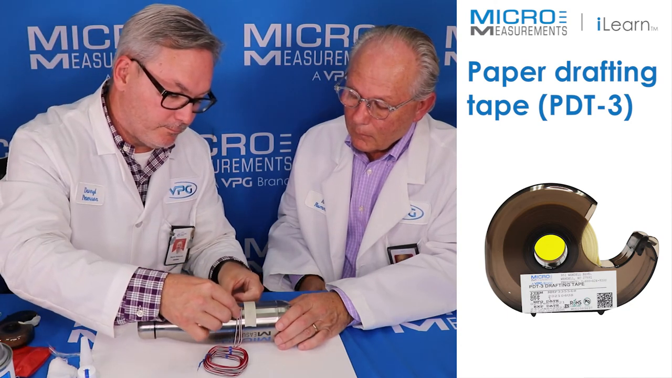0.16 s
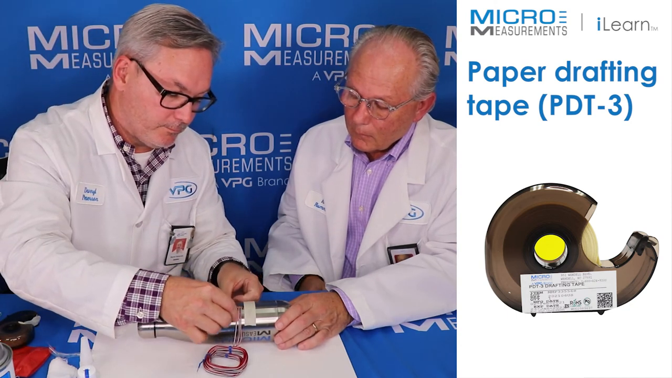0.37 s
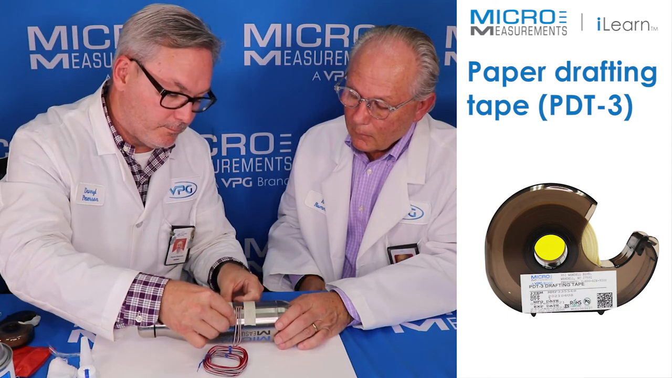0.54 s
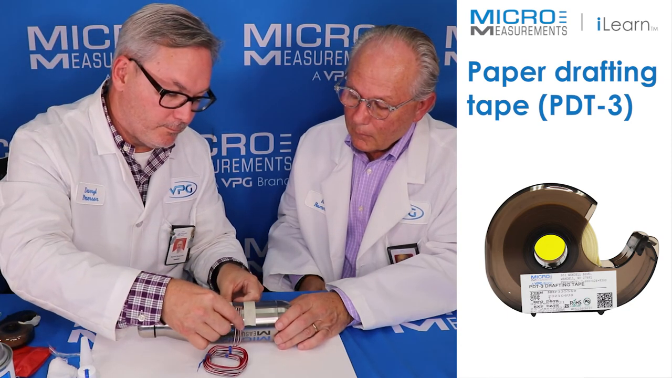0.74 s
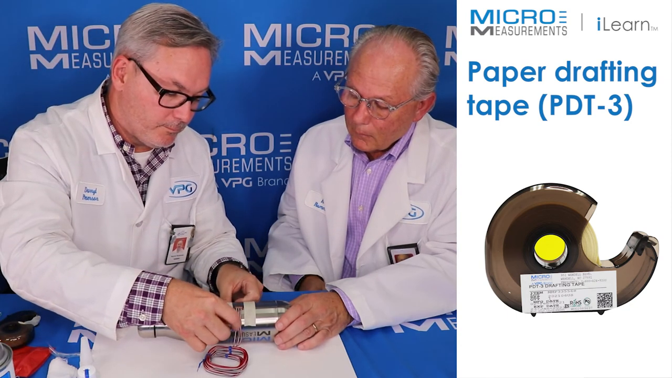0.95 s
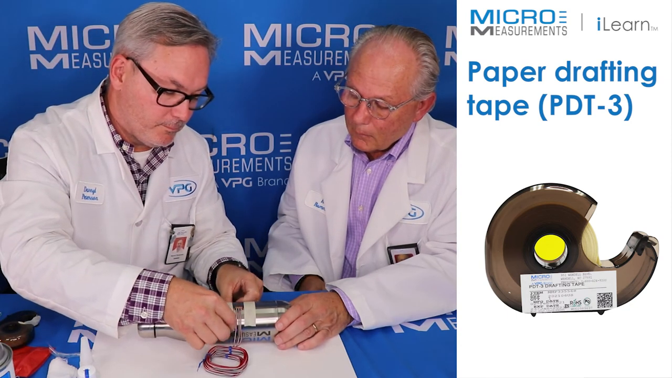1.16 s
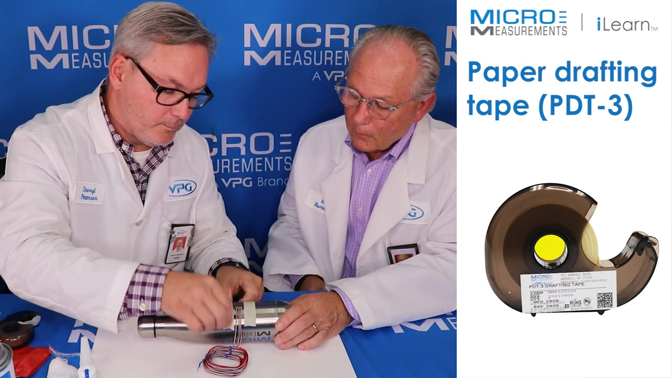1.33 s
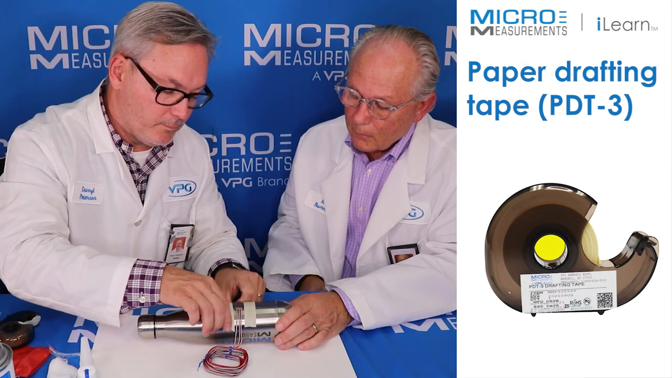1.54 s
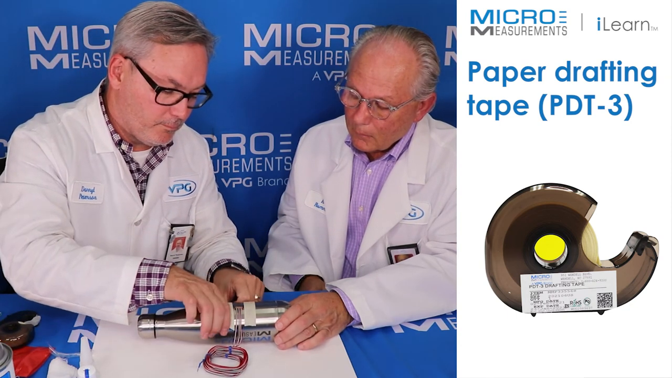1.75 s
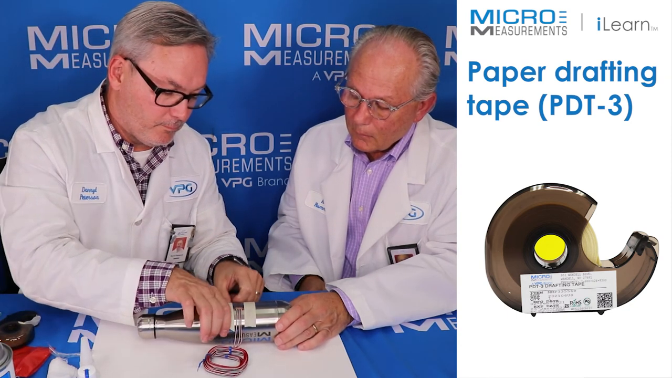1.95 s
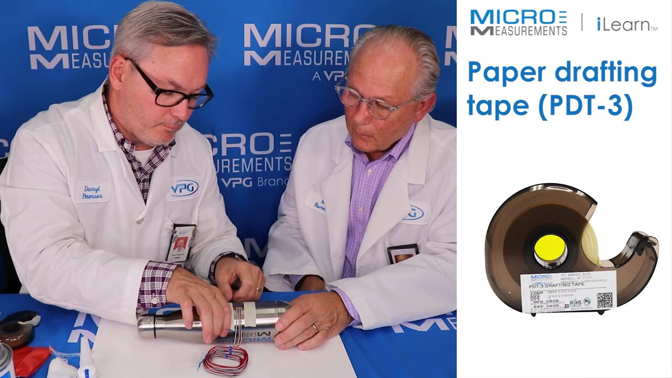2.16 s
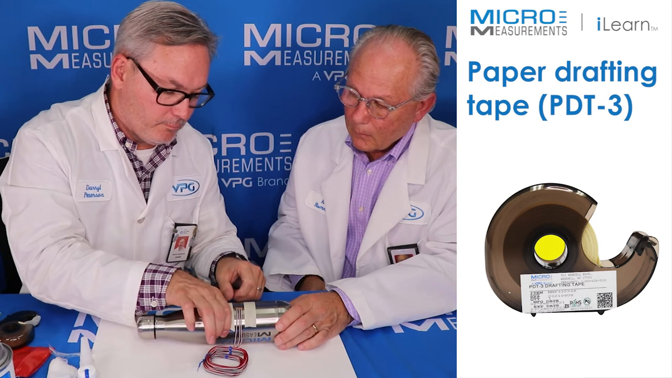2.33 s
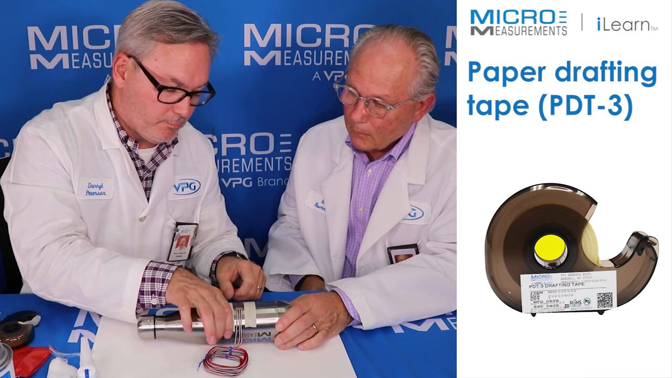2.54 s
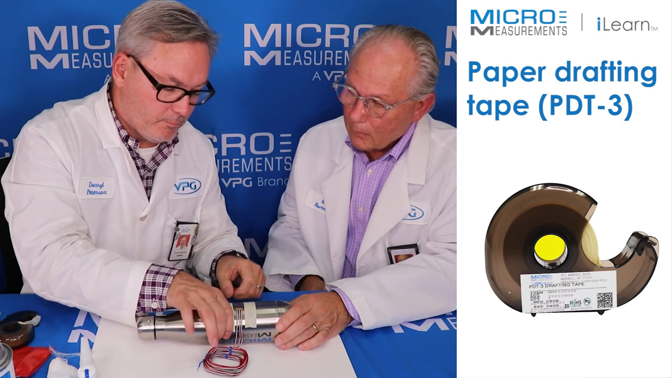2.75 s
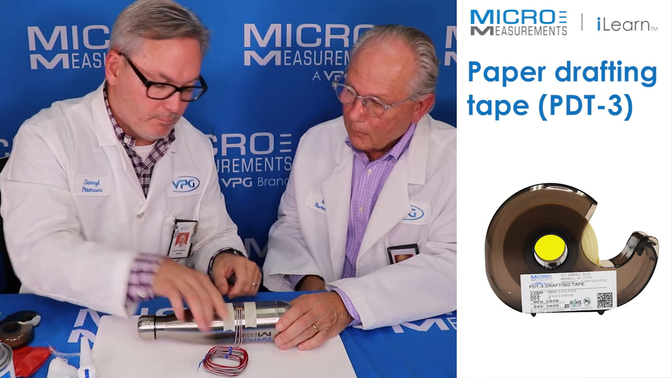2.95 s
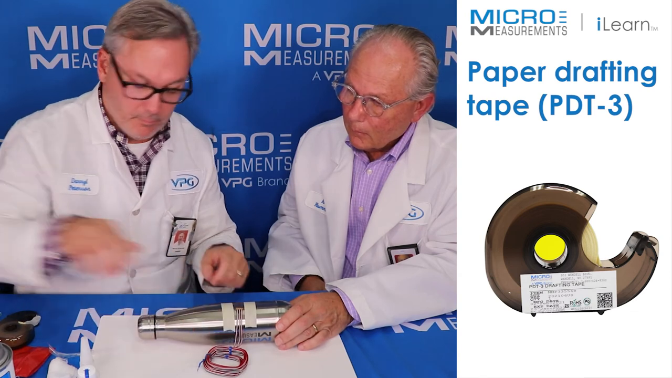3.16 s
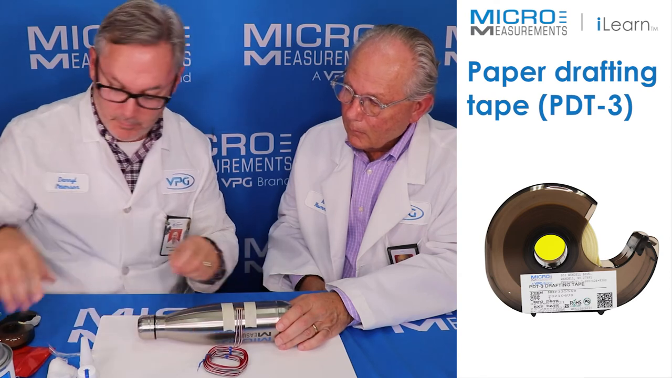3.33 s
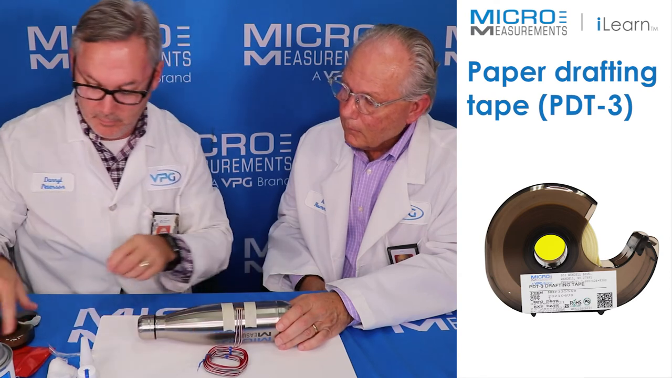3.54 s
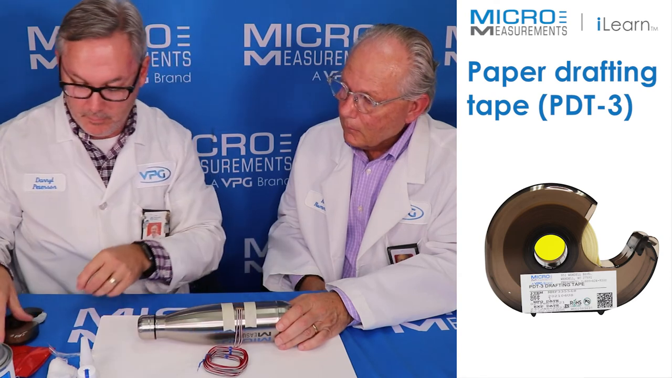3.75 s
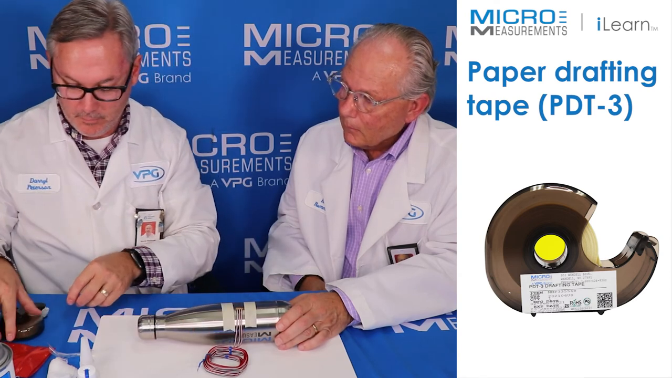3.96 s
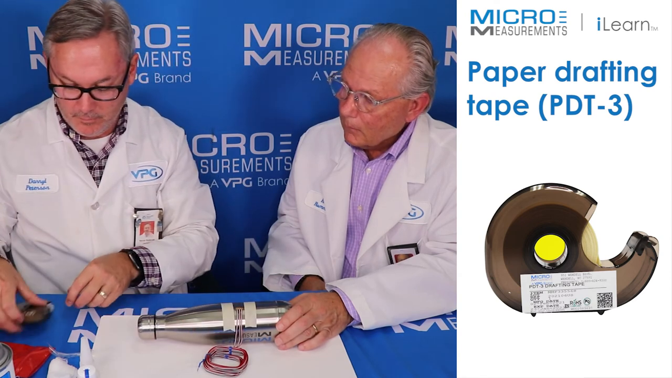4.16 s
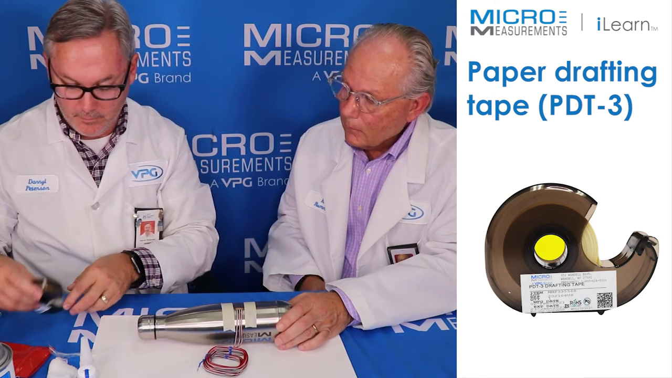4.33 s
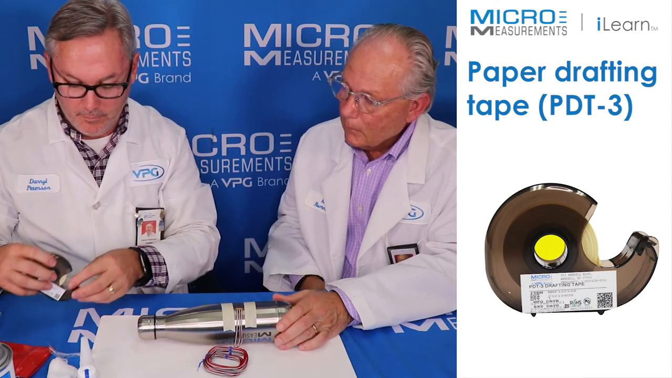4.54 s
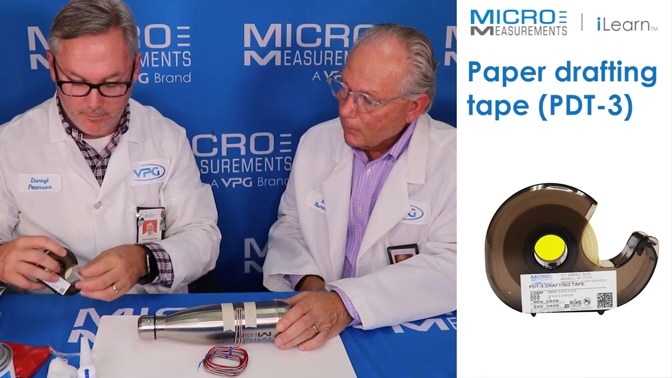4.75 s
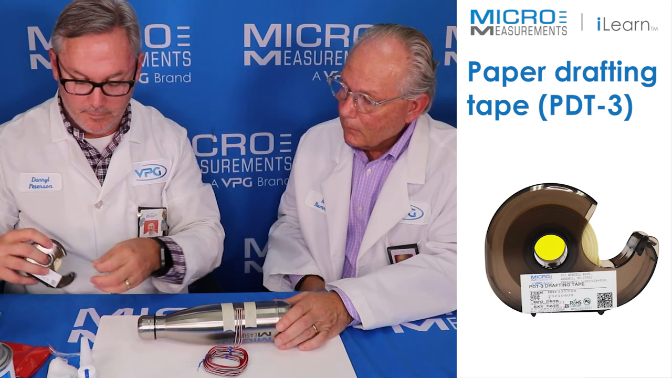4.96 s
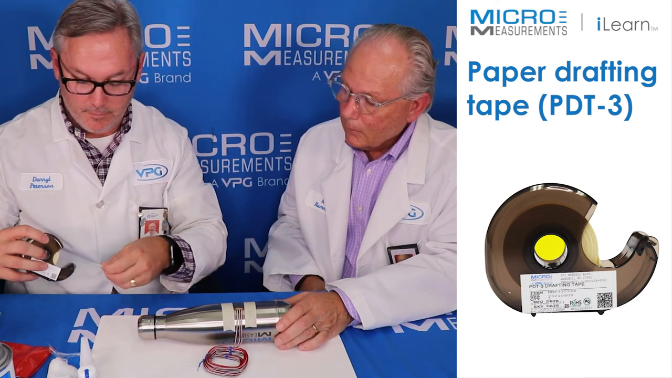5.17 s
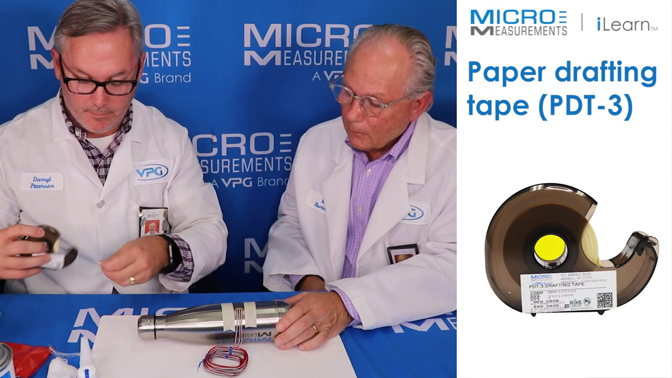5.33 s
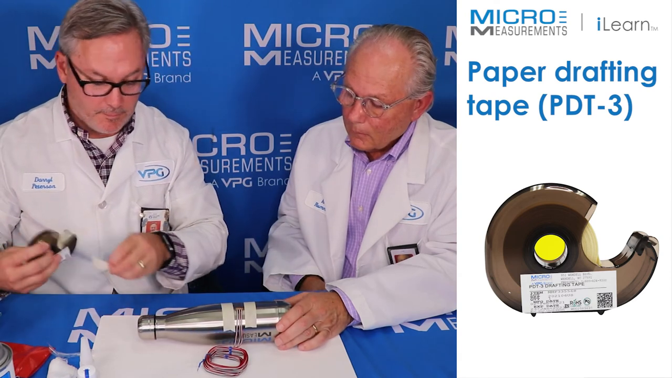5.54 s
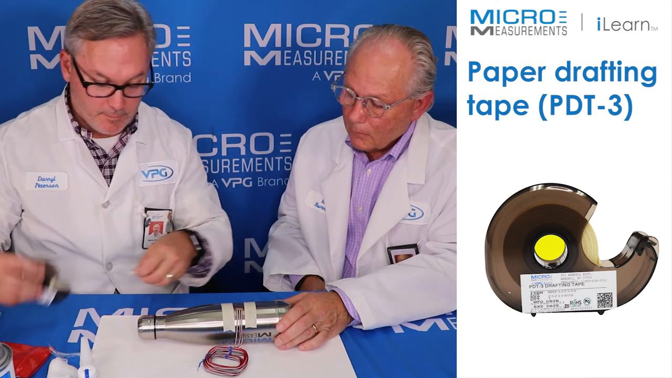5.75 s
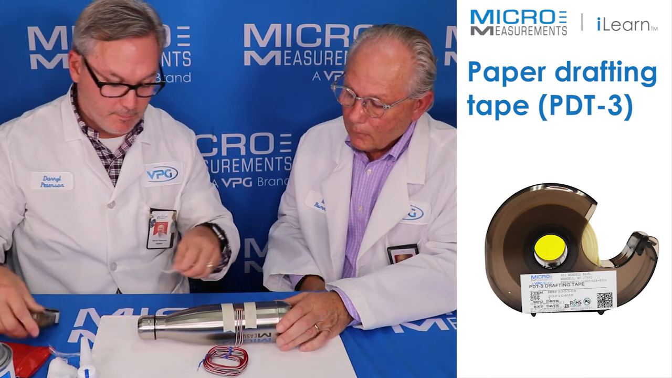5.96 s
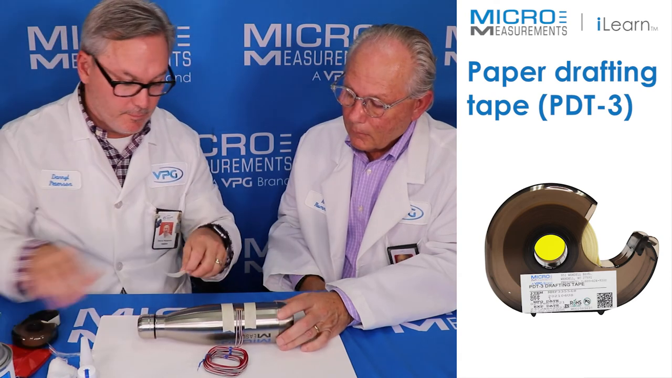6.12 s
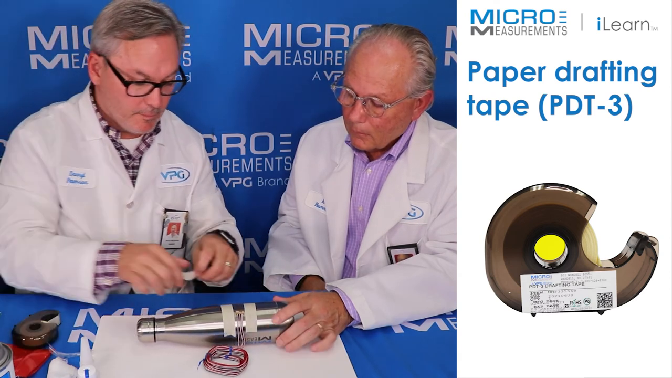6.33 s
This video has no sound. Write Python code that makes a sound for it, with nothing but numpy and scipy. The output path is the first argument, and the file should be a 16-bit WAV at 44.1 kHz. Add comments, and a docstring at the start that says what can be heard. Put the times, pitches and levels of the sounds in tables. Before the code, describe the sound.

Mostly near silence over soft air rumble and fan hum, with faint dry rubs on tape stuck to a metal tube. A plastic tape dispenser is handled with dull little ticks. Sticky crackles and a short papery pull lead to a very fast tear and one loud, dry snap with tiny flicks after it. The dispenser is set down in a rocking clatter, closely miked in a small room with a short tail.

```python
"""In a small, quiet room with a cloth-covered table, paper tape is rubbed down on a metal tube.
A plastic dispenser is picked up; a strip is unstuck, peeled off the roll and torn until it snaps free.
The dispenser is then put back on the table with a clatter. Ventilation rumbles and hums throughout.
Glue, paper and skin are streams of tiny random clicks sent through resonances; knocks are single clicks
with a short chatter. The squeaks and the hum are sine tones, and the rumble is coloured noise."""
import sys
import numpy as np
from scipy import signal
from scipy.fft import rfft, irfft
from scipy.io import wavfile

SR = 44100
rng = np.random.default_rng(int(sys.argv[2]) if len(sys.argv) > 2 else 0)


def transcribe(u):
    """Save the signal u as a 16-bit wav file named by the first command-line argument.

    u: samples, shape (n,) or (channels, n), limited to [-1, 1]; the rate is SR.
    q: integer samples, one column per channel.
    """
    v = np.clip(np.atleast_2d(u).T, -1, 1)
    q = np.round(v * 32767).astype(np.int16)
    wavfile.write(sys.argv[1], SR, q)


N = 286429
TIME = np.arange(N) / SR  # seconds

# pulls on the strip, first to unstick it, then to draw it out: fastest_s, length_s, level_db
PULLS = [(4.749, 0.13, -41), (4.958, 0.31, -33.5)]
PULL_EASE_DB = 22  # a pull starts and ends this far under its peak

# runs of paper fibres giving way on the teeth: start_s, length_s, level_db, swell_db, dull_above_hz
TEARS = [(5.388, 0.059, -42.5, 31.5, 14000), (5.433, 0.0071, -33.5, 2, 5000),
         (5.4503, 0.0029, -30.5, 1.5, 14000), (5.4545, 0.019, -19.5, 5.5, 11900),
         (5.515, 0.0099, -42, 0, 11000), (5.54, 0.052, -41.5, 5, 8040), (5.592, .007, -35.5, 8.5, 10000),
         (5.604, 0.024, -40.5, -12, 4200)]
TEAR_ATTACK_S, TEAR_RELEASE_S, TEAR_THIN_HZ = 0.00092, 0.0022, 650
FLAP_FREE_S = 5.5  # the tear has run far enough to loosen the strip

# the strip snaps free and its ends flick:
# start_s, level_db, thin_below_hz, dull_above_hz, chatter_share (0 to 1), favoured_pitch_hz
SNAPS = [(5.5996, -10.5, 1100, 12900, 0.22, 2570), (5.621, -35.5, 600, 2980, .5, 1925),
         (5.6488, -33, 604, 3470, 0.23, 1840), (5.6638, -36.5, 2000, 5000, 0.17, 4450)]

# glue lets go and the strip crackles: start_s, level_db, thin_below_hz, favoured_pitch_hz
CRACKLES = [(0.721, -64, 6000, 6900), (0.933, -65, 11000, 11000), (0.971, -50, 12150, 12500),
            (0.992, -59, 11000, 11000), (1.001, -60, 10110, 9500), (3.700, -47.5, 3150, 4400),
            (4.324, -52, 11500, 12040), (4.693, -53, 6000, 7000), (4.7061, -23.5, 1810, 4100),
            (4.7205, -40, 2500, 4200), (4.7335, -47, 2000, 3500), (4.744, -28.5, 298, 3100),
            (4.7515, -30.5, 300, 3240), (4.868, -35.5, 1200, 7000), (5.151, -41, 4060, 6000),
            (5.7485, -54.5, 1007, 4460)]
CRACKLE_REACH, CRACKLE_CHATTER = 3.8, 0.72  # high edge as a factor on the pitch; chatter share

# fingers and sleeve sliding over tape and plastic: start_s, length_s, level_db, centre_hz
RUBS = [(0.42, 0.082, -46.5, 5200), (0.88, 0.18, -72, 10900), (1.17, 0.088, -64.5, 1400),
        (1.45, 0.099, -55.5, 2800), (1.53, .17, -60, 2800), (1.71, 0.1, -68.5, 2650),
        (3.05, 0.37, -70, 3900), (3.69, 0.082, -56.5, 3500), (3.80, 0.074, -57.5, 5200),
        (3.925, 0.096, -54, 3050), (4.06, 0.12, -66, 3080), (4.32, 0.044, -57.5, 11300),
        (5.12, 0.18, -46, 6600), (5.78, 0.086, -65.5, 6100)]
RUB_SPREAD = 1.46  # the band of a rub reaches this factor to either side of its centre

# a fingertip sticks and slips on the tube or the dispenser: start_s, length_s, level_db, pitch_hz
SQUEAKS = [(1.188, .04, -58.5, 2520), (4.01, .19, -73, 6620), (4.06, .075, -66, 5980)]
SQUEAK_SAG_PER_S = 0.33  # share of its first pitch that a squeak loses per second

# the dispenser comes down on the table, before the rocking steps below:
# start_s, level_db, thin_below_hz, dull_above_hz
LANDINGS = [(5.9612, -27.5, 450, 1593), (6.0572, -38.5, 2400, 6030), (6.1199, -12, 420, 11440),
            (6.1802, -19.5, 700, 4500)]
# every landing is a tick, the main hit and two rocking contacts:
# delay_s, added_level_db, band_factor, favoured_pitch_hz, chatter_share (0 to 1)
ROCKING = [(-.0047, -18, 0.74, 3670, 0.26), (0, 1, 1.05, 2834, 0.33), (.0018, -3.5, 1.1, 6440, 0.77),
           (.0042, -4, 0.54, 720, 0.67)]

# fingers and table touch the dispenser lightly: start_s, level_db, favoured_pitch_hz, dull_above_hz
TOUCHES = [(2.545, -58.5, 2570, 2400), (2.899, -60, 2520, 2900), (3.7233, -49.5, 830, 3000),
           (3.824, -40, 1080, 1400), (4.075, -37, 1090, 1120), (4.102, -51, 2790, 4900),
           (4.225, -52, 2500, 1900), (4.273, -41, 574, 1080), (4.2742, -42.5, 1900, 1700),
           (5.822, -45, 2650, 3850), (5.979, -35, 730, 5550), (6.214, -37, 2400, 5000)]
TOUCH_THIN, TOUCH_CHATTER = 0.63, 0.38  # low edge as a share of the pitch; chatter share

# Resonances, all with the columns pitch_hz, width_hz, level_db (relative within the table).
# the strip between roll and fingers: pitch_hz, width_hz, level_db
STRIP = [(556, 120, -6), (1570, 190, -6.5), (1870, 160, -9), (2506, 136, 4.5), (2576, 265, 2),
         (3264, 310, 1), (4059.4, 330, -2), (5150, 340, -0.5), (5680, 340, -1), (6710, 880, -4.5),
         (8010, 1600, -6.5), (9800, 620, -7), (10750, 710, -5), (13560, 1800, -8), (15500, 1800, -12.5)]
# the roll in its housing: pitch_hz, width_hz, level_db
ROLL = [(495, 120, -1), (554, 112, 6.5), (690, 120, -7)]
# the strip pulled taut over the teeth: pitch_hz, width_hz, level_db
TAUT = [(623, 320, -17.5), (830, 120, -11), (980, 46, -6.5), (1518, 67, 0.5), (1676, 92, -1),
        (1994, 130, -9), (2300, 140, -10.5), (2715, 130, -10.5), (3380, 230, -5.5), (4300, 650, -11.5),
        (6230, 780, -12), (7800, 1100, -13), (10400, 1400, -16), (14260, 1400, -17)]
# the loose flap, once the tear is under way: pitch_hz, width_hz, level_db
FLAP = [(1020, 120, -7.5), (1750, 140, -7), (1754, 150, 0), (2650, 160, -6.5), (3457.4, 310, -6.5),
        (4070, 400, -5.5), (5220, 1000, -13), (7360, 2100, -14.5), (11500, 3000, -18)]
# the short end left on the dispenser: pitch_hz, width_hz, level_db
STUB = [(890, 310, -13), (1694, 150, -6.5), (1980, 81, -4), (2430, 210, -9), (3040, 270, -2),
        (3454, 420, -4.5), (5200, 950, -13), (7700, 1300, -14), (8930, 990, -10.5), (12000, 3900, -28.5)]
# tape stuck on a hard surface, under a finger: pitch_hz, width_hz, level_db
STUCK_TAPE = [(1230, 190, -1), (2100, 160, -11), (2470, 60, -0.5), (2820, 150, -6), (3230, 180, 1),
              (3550, 290, -1.5), (4030, 310, -3), (4950, 530, -6.5), (5550, 1200, -8.5), (7140, 650, -8),
              (8100, 790, -11), (10050, 1100, -9), (11000, 1300, -6), (14600, 3200, -10.5)]
# the plastic shell, damped by the hand and the cloth: pitch_hz, width_hz, level_db
SHELL = [(286, 37, -2.5), (448, 154, -4), (545, 210, -7.5), (763, 65, 2), (927, 120, -0.5), (1090, 36, 0.5),
         (1340, 94, -5), (1670, 180, -6), (1918, 100, -0.5), (2250, 190, 0), (2465, 170, -3),
         (2673, 76, -2), (2940, 92, -11), (3243, 110, 2.5), (3270, 430, -2), (3870, 130, -1.5),
         (4076, 120, -6.5), (5410, 640, -8.5), (5630, 180, -6), (7000, 500, -5.5), (7430, 800, -11),
         (8800, 740, -11), (10230, 1700, -12), (14430, 3500, -21.5)]

# tone of the echoes and of the room tail: frequency_hz, gain_db
ROOM_COLOUR = [(150, -4), (400, 9), (750, 7), (1500, 2), (3400, 0.5), (5000, 2), (9000, -9.5),
               (16000, -0.5)]
# time for the room tail to fall by 60 dB: frequency_hz, decay_s
ROOM_T60 = [(200, 0.29), (1000, 0.21), (3000, 0.16), (6000, 0.23), (14000, 0.27)]
# shape of the air rumble: frequency_hz, relative_level_db (per Hz)
AIR = [(12, -77.5), (20, -23.5), (65, -4), (120, -4.5), (154, -6.5), (177, -13.5), (248, -12.5),
       (319, -16.5), (388, -14), (558, -23), (624, -21.5), (780, -24), (3340, -36.5), (5380, -48),
       (16000, -54.5)]
RUMBLE_DB = -51.5
# strength of the fan hum, before each of its two tones is set: time_s, level_db
HUM = [(0, -60), (1.2, -58.5), (1.8, -54.5), (2.5, -52), (3.1, -54.5), (3.7, -59), (4.8, -58.1), (5.6, -55),
       (6.49, -55)]
HUM_HZ = 74.3
CUTOFF_HZ = 15900


def pulling():
    """Level of the peel in dB: every pull speeds up and slows down in one arch."""
    arches = [level_db - PULL_EASE_DB * (2 * (TIME - fastest_s) / length_s) ** 2
              for fastest_s, length_s, level_db in PULLS]
    return np.maximum(np.max(arches, axis=0), -120)


def peel(per_s=14000, spread_db=5.5, flutter_db=-2.5, wander_db=3.5, wander_rate=80,
         pops_per_s=450, pops_db=3.0, pops_hz=4500, roll_db=-12.5, roll_lag_s=0.021):
    """Threads of glue break, more densely as the pull quickens, and shake the strip and the roll."""
    level_db = pulling()
    effort = from_db(level_db)
    speed = from_db((level_db - level_db.max()) / 2)  # 1 at the fastest moment
    # denser breaks would also be louder; dividing by the root of the speed undoes that
    breaks = grains(per_s * speed, spread_db, N) / np.sqrt(speed) * np.sqrt(speed.mean())
    pull = breaks * effort * from_db(flutter_db * drift(250))

    # as the peel line moves, groups of resonances swell and fade on their own
    power = np.array([width_hz * from_db(2 * db) for _, width_hz, db in STRIP])
    strip = np.zeros(N)
    for group in np.array_split(np.arange(len(STRIP)), 5):
        share = np.sqrt(power[group].sum() / power.sum())
        ringing = signal.oaconvolve(pull, body([STRIP[k] for k in group]))[:N]
        strip += share * ringing * from_db(wander_db * drift(wander_rate))

    # thicker threads give single bright pops
    pops = grains(pops_per_s, 2.0, N) * effort
    pops = cut(cut(pops, pops_hz, "high"), 9000, "low")

    # the roll spins up a little after the pull and drones in its housing
    spin = np.interp(TIME - roll_lag_s, TIME, effort * speed ** 4)
    drone = rms_one(signal.oaconvolve(breaks, body(ROLL))[:N]) * spin
    return strip + from_db(pops_db) * pops + from_db(roll_db) * drone


def tear(catch_db=4.0, bundles_per_s=450, bundles_db=0.0):
    """Single fibres and whole bundles part in quick runs and ring the taut strip, then the loose flap."""
    single = grains(per_s=6500, spread_db=2.0, size=N) * from_db(catch_db * drift(400))
    bundles = from_db(bundles_db) * grains(bundles_per_s, 0.5, N)
    fibres = runs(TEARS, single + bundles)
    loose = TIME > FLAP_FREE_S
    taut_sound = signal.oaconvolve(fibres * ~loose, body(TAUT))
    flap_sound = signal.oaconvolve(fibres * loose, body(FLAP))
    return (taut_sound + flap_sound)[:N]


def runs(events, texture):
    """Each run starts at once, grows or fades as the tension changes and stops short."""
    out = np.zeros(N)
    for start_s, length_s, level_db, swell_db, dull_hz in events:
        piece = stretch(texture, start_s, length_s, TEAR_THIN_HZ, dull_hz)
        t = np.arange(len(piece)) / SR
        gate = np.clip(np.minimum(t / TEAR_ATTACK_S, (length_s - t) / TEAR_RELEASE_S), 0, 1)
        run = rms_one(piece * gate * from_db(swell_db * t / length_s))
        add(out, start_s, from_db(level_db) * run)
    return out


def snap():
    """The strip snaps free: sharp contacts ring the short end left on the dispenser."""
    return strike(SNAPS, STUB, chatter_s=0.0028, favour_db=10.5, crack_db=-27.5)


def crackle():
    """Glue breaks and rings the strip: the higher the pitch, the further the treble reaches."""
    events = [(start_s, level_db, thin_hz, CRACKLE_REACH * pitch_hz, CRACKLE_CHATTER, pitch_hz)
              for start_s, level_db, thin_hz, pitch_hz in CRACKLES]
    return strike(events, STRIP, chatter_s=0.003, favour_db=11.0, crack_db=-5.5)


def rubbing(catch_db=0.3):
    """Skin and cloth catch and slip on a fine rough surface."""
    slips = grains(per_s=8200, spread_db=3.5, size=N) * from_db(catch_db * drift(300))
    return strokes(RUBS, signal.oaconvolve(slips, body(STUCK_TAPE))[:N])


def strokes(events, texture):
    """Each stroke swells and fades in a band around its centre."""
    out = np.zeros(N)
    for start_s, length_s, level_db, centre_hz in events:
        piece = stretch(texture, start_s, length_s, centre_hz / RUB_SPREAD, centre_hz * RUB_SPREAD)
        swell = np.sin(np.linspace(0, np.pi, len(piece)))
        add(out, start_s, from_db(level_db) * piece * swell)
    return out


def squeak(jitter=0.0069):
    """Short, unsteady stick-slip tones that sag as the finger slows."""
    out, unsteady = np.zeros(N), 1 + jitter * drift(400)
    for start_s, length_s, level_db, pitch_hz in SQUEAKS:
        t = np.arange(int(length_s * SR)) / SR
        pitch = pitch_hz * (1 - SQUEAK_SAG_PER_S * t) * unsteady[int(start_s * SR):][:len(t)]
        tone = np.sin(2 * np.pi * np.cumsum(pitch) / SR)
        add(out, start_s, from_db(level_db) * np.sin(np.pi * t / length_s) * tone)
    return out


def knocking():
    """Light touches and landings make the plastic shell of the dispenser ring."""
    return strike(touches() + landings(), SHELL, chatter_s=0.0022, favour_db=6.5, crack_db=-1.5)


def landings():
    """The contacts of the dispenser as it rocks onto its feet at each landing."""
    return [(start_s + delay_s, level_db + step_db, band * thin_hz, band * dull_hz, share, pitch_hz)
            for start_s, level_db, thin_hz, dull_hz in LANDINGS
            for delay_s, step_db, band, pitch_hz, share in ROCKING]


def touches():
    """Light contacts: the higher the pitch, the thinner the sound."""
    return [(start_s, level_db, TOUCH_THIN * pitch_hz, dull_hz, TOUCH_CHATTER, pitch_hz)
            for start_s, level_db, pitch_hz, dull_hz in TOUCHES]


def strike(events, modes, chatter_s, favour_db, crack_db, crack_hz=7000, size=4096):
    """Each contact sends a click and a brief chatter into a body; its level is set over the first 5 ms."""
    out, response, t = np.zeros(N), body(modes), np.arange(size) / SR
    for start_s, level_db, low_hz, high_hz, share, pitch_hz in events:
        share = np.clip(share, 0, 1)
        chatter = unit_energy(rng.standard_normal(size) * np.exp(-t / chatter_s))
        force = np.sqrt(share) * chatter
        force[0] = np.sqrt(1 - share)  # the click
        # the contact itself adds a dry crack to the ringing
        crack = from_db(crack_db) * cut(force, crack_hz, "low")
        hit = signal.fftconvolve(force, response)[:size] + crack
        hit = cut(cut(hit, low_hz, "high"), high_hz, "low")
        # the place of contact favours the resonances around one pitch
        peak_filter = signal.iirpeak(min(pitch_hz, 0.45 * SR), 5.0, fs=SR)
        hit = hit + from_db(favour_db) * signal.lfilter(*peak_filter, hit)
        add(out, start_s, from_db(level_db) * hit / np.std(hit[:SR // 200]))
    return out


def reflections(x, first_echo_s=0.0063, fade_s=0.011, per_s=1200, dull_hz=4500, size=6000):
    """Sparse, dull echoes from the table, the tube and the people at it."""
    t = np.arange(size) / SR
    echoes = grains(per_s, 0.98, size) * np.exp(-t / fade_s) * (t > first_echo_s)
    echoes = cut(unit_energy(echoes), dull_hz, "low")
    return signal.oaconvolve(x, colour(echoes, ROOM_COLOUR)[:size - 500])[:N]


def room(x, first_echo_s=0.012, size=26000):
    """A diffuse tail of noise that dies away at its own speed in each of eight bands."""
    t, edges = np.arange(size) / SR, np.geomspace(100, 18000, 9)
    tail = np.zeros(size)
    for low_hz, high_hz in zip(edges, edges[1:]):
        decay_s = at_hz(ROOM_T60, np.sqrt(low_hz * high_hz))
        tail += cut(rng.standard_normal(size), [low_hz, high_hz], "band") * from_db(-60 * t / decay_s)
    tail = unit_energy(tail * (t > first_echo_s))
    return signal.fftconvolve(x, colour(tail, ROOM_COLOUR)[:size - 500])[:N]


def ventilation(octave_db=2.0, fundamental_db=-2.5, fundamental_follows=2.8):
    """Steady air rumble and a wavering fan hum; its lower tone comes out when the hum is strong."""
    hum_db, = in_time(HUM)
    phase = 2 * np.pi * HUM_HZ * TIME + 0.25 * drift(2)
    strongest_db = hum_db.max()
    low_db = fundamental_db + strongest_db + fundamental_follows * (hum_db - strongest_db)
    low = from_db(low_db) * np.sin(phase)
    octave = from_db(octave_db + hum_db) * np.sin(2 * phase)
    rumble = from_db(RUMBLE_DB) * rms_one(colour(rng.standard_normal(N), AIR))
    return rumble + low + octave


def grains(per_s, spread_db, size):
    """Tiny ruptures at random moments, most small and a few large; rms 1."""
    sizes = from_db(spread_db * np.minimum(rng.exponential(1, size), 4)) * rng.choice([-1, 1], size)
    return rms_one(sizes * (rng.random(size) < per_s / SR))


def body(modes, size=4096):
    """Impulse response of resonances side by side with alternating signs; a wider one dies sooner."""
    t = np.arange(size) / SR
    response = np.zeros(size)
    for k, (pitch_hz, width_hz, level_db) in enumerate(modes):
        ring = np.exp(-np.pi * width_hz * t) * np.cos(2 * np.pi * pitch_hz * t)
        response += (-1) ** k * from_db(level_db) * width_hz * ring
    return unit_energy(response)


def stretch(texture, start_s, length_s, low_hz, high_hz):
    """A piece of a texture, limited to a band; rms 1."""
    at = int(start_s * SR)
    piece = texture[at:at + int(length_s * SR)]
    return rms_one(cut(cut(piece, low_hz, "high"), high_hz, "low"))


def drift(rate):
    """Slow random wandering with this many turning points per second at most; rms 1."""
    knots = rng.standard_normal(4000)
    return rms_one(np.interp(TIME * rate, np.arange(len(knots)), knots))


def colour(x, spectrum):
    """Give a sound a smooth spectrum."""
    gain = from_db(at_hz(spectrum, np.fft.rfftfreq(len(x), 1 / SR)))
    return irfft(rfft(x) * gain, len(x))


def cut(x, hz, kind, order=2):
    """Butterworth filter: keeps the highs, the lows or a band."""
    sections = signal.butter(order, np.clip(hz, 10, 0.45 * SR), kind, fs=SR, output="sos")
    return signal.sosfilt(sections, x)


def at_hz(points, hz):
    """Read a table on a log-frequency axis."""
    known, values = np.transpose(points)
    return np.interp(np.log(hz + 1e-9), np.log(known), values)


def in_time(rows):
    """Each column of a curve at every sample."""
    time_s, *columns = np.transpose(rows)
    return [np.interp(TIME, time_s, column) for column in columns]


def add(out, start_s, sound):
    """Mix a sound in at a given time."""
    at = int(start_s * SR)
    out[at:at + len(sound)] += sound[:N - at]


def from_db(db):
    """Decibels to gain."""
    return 10 ** (np.asarray(db) / 20)


def rms_one(x):
    """Scale to rms 1."""
    return x / np.sqrt(np.mean(x ** 2) + 1e-20)


def unit_energy(x):
    """Scale to a sum of squares of 1."""
    return x / np.sqrt(np.sum(x ** 2) + 1e-20)


def scene(tape_near_db=-11.5, snap_near_db=-25.0, knock_near_db=-14.5, tape_room_db=-16.0, hit_room_db=-17.0):
    """Tape and dispenser near the microphone, with close echoes, the room tail and the ventilation."""
    tape = peel() + tear() + rubbing() + squeak() + crackle()
    snaps = snap()
    knocks = knocking()
    to_echoes = from_db(tape_near_db) * tape + from_db(snap_near_db) * snaps + from_db(knock_near_db) * knocks
    to_room = from_db(tape_room_db) * tape + from_db(hit_room_db) * (snaps + knocks)
    direct = tape + snaps + knocks
    return (direct + reflections(to_echoes) + room(to_room) + ventilation())[None]


def record(dry):
    """Peaks beyond full scale are clipped, then the top of the treble is cut steeply."""
    top_cut = signal.ellip(10, 0.1, 70, CUTOFF_HZ, fs=SR, output="sos")
    return signal.sosfilt(top_cut, np.clip(dry, -1, 1))


dry = scene()
out = record(dry)
transcribe(out)
```